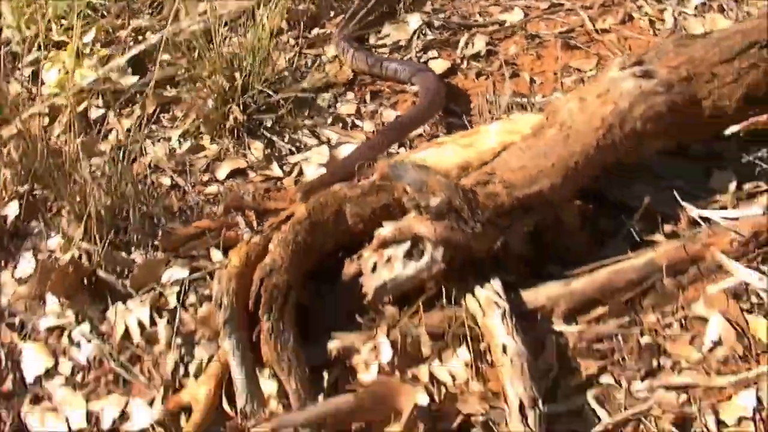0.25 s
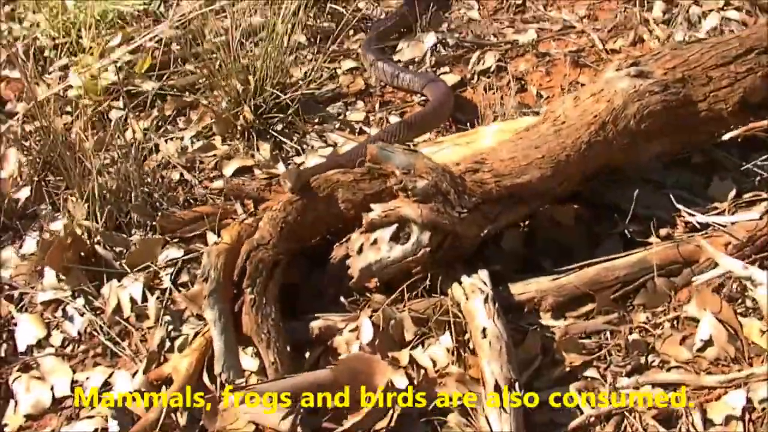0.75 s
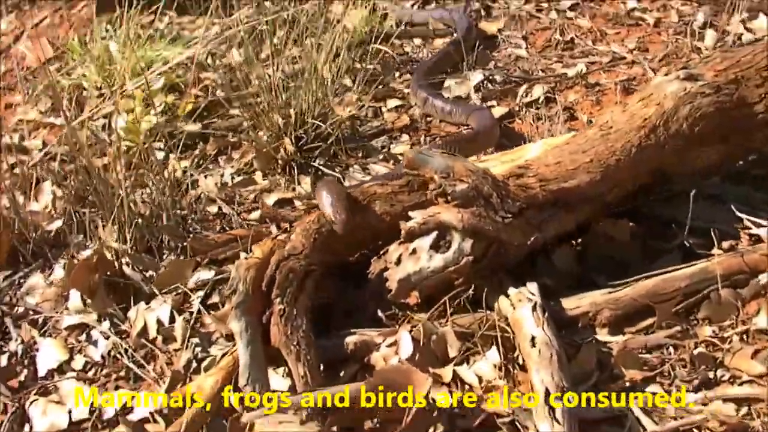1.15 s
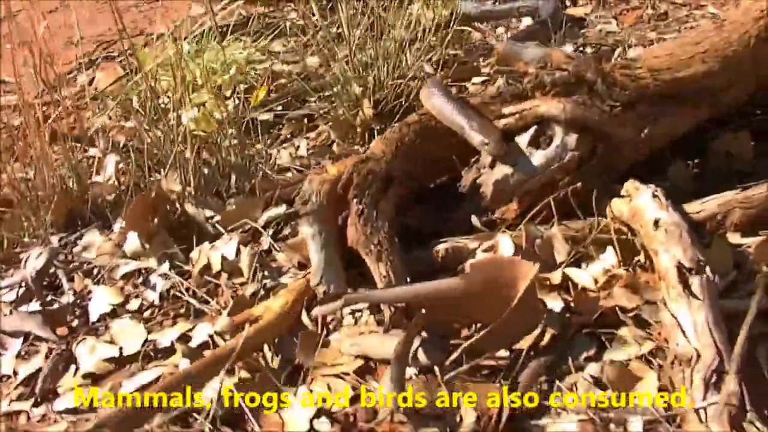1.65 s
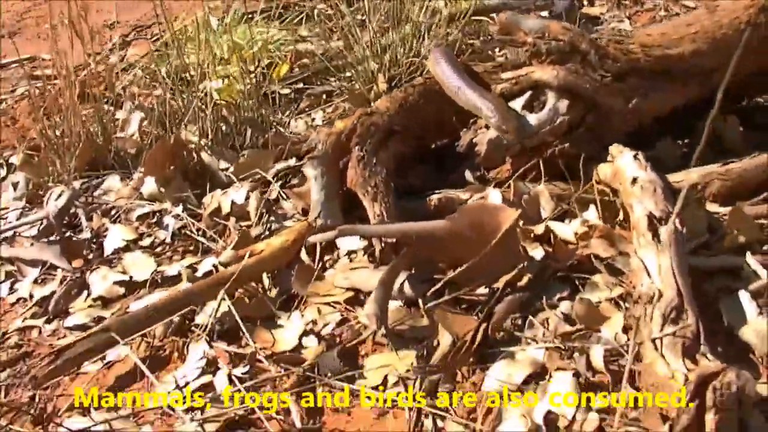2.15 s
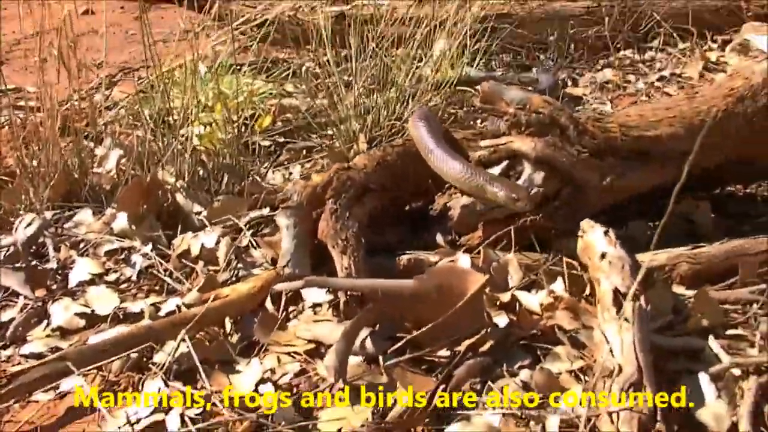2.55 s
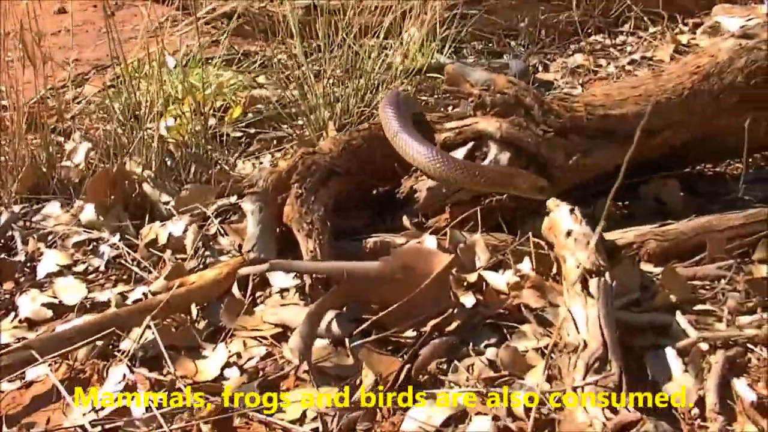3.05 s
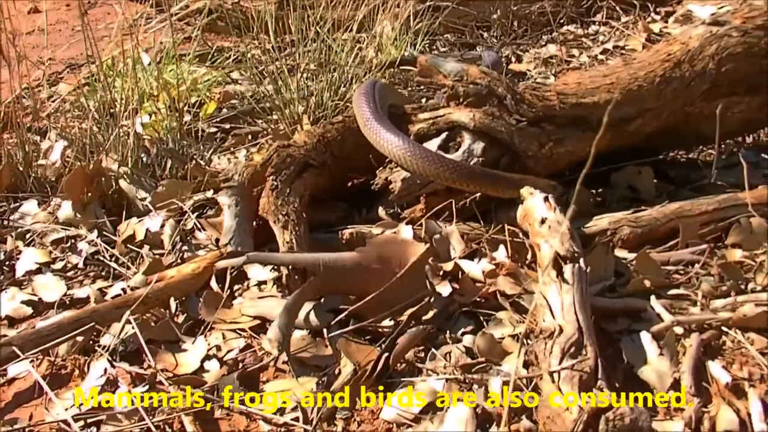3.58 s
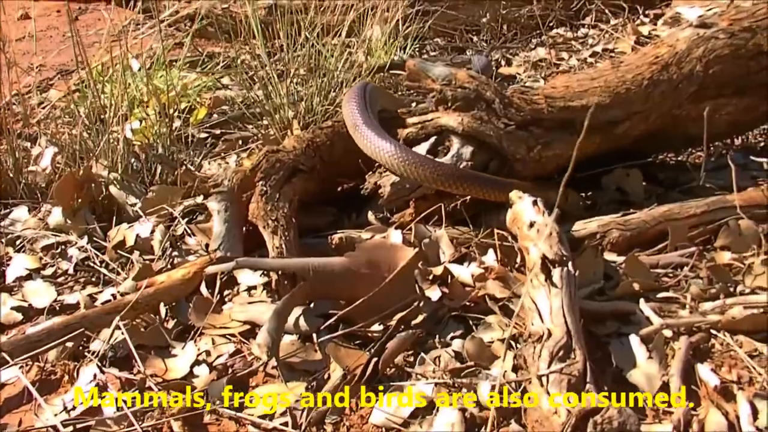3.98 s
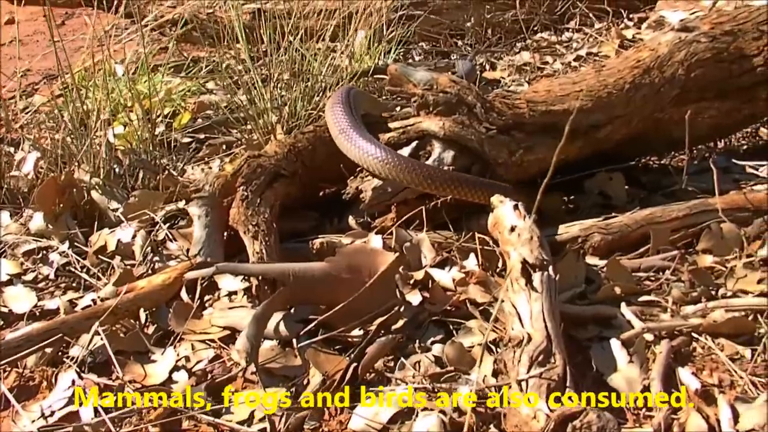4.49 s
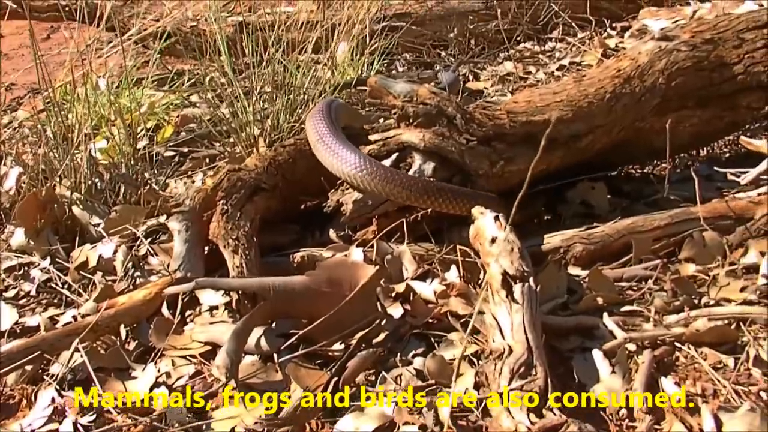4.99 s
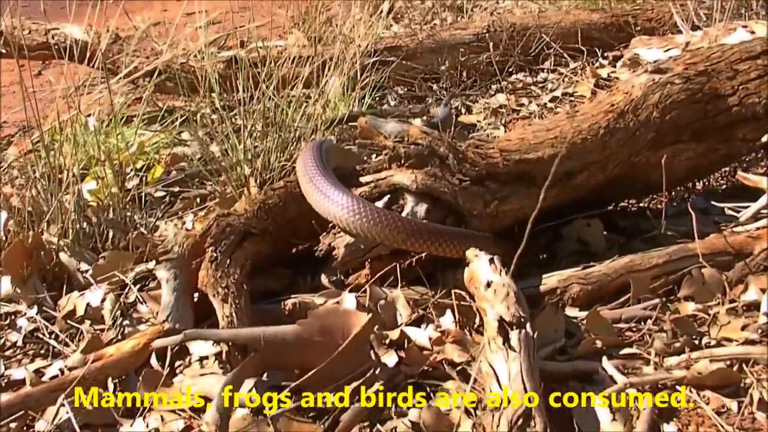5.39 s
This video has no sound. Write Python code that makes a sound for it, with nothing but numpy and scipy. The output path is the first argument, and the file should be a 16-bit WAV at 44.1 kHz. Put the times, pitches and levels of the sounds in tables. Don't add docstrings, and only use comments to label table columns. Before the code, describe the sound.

Very close, a snake pushes through dry leaf litter: dense crisp crackling with sharp snaps, loudest within the first second, then thinning to scattered ticks. Thin, very high squeaks follow as scales catch on bark, then a faint sliding hiss. Low wind puffs bump the small stereo microphone in two gusts over a quiet open-air hush, and a fly buzzes briefly at the very end.

```python
import sys
import numpy as np
from scipy import signal
from scipy.fft import rfft, irfft
from scipy.io import wavfile
from scipy.ndimage import uniform_filter1d

SR = 44100
rng = np.random.default_rng(int(sys.argv[2]) if len(sys.argv) > 2 else 0)


def invert_db(x):
    u = np.asarray(x, float) / 20
    return 10 ** u


def waveform_to_disk(signal):
    frames = np.transpose(np.atleast_2d(signal))
    scaled = np.clip(frames, -1, 1) * 32767
    samples = np.round(scaled).astype(np.int16)
    wavfile.write(sys.argv[1], SR, samples)


N = 248283
HZ = np.fft.rfftfreq(N, 1 / SR)
T = np.arange(N) / SR

# (low edge [Hz], high edge [Hz])
PIECE_BANDS = [(6000, 99000), (1500, 6000), (350, 1500)]


def evened(x):
    return x / np.sqrt(np.mean(x ** 2) + 1e-20)


def read(points, hz):
    f, value = np.transpose(points)
    return np.interp(np.log(hz + 1), np.log(f + 1), value)


def curve(rows, column, edge_db=-90):
    rows = np.array(rows)
    return np.interp(T, rows[:, 0], rows[:, column], edge_db, edge_db)


def band(x, lo_hz, hi_hz):
    sos = signal.butter(2, [lo_hz, min(hi_hz, SR / 2.2)], "band", fs=SR, output="sos")
    return signal.sosfilt(sos, x)


def share(hz, lo_hz, hi_hz):
    return np.sqrt(1 / (1 + (lo_hz / (hz + 1)) ** 8) / (1 + (hz / hi_hz) ** 8))


def pair(a, b, same):
    half = np.arccos(np.clip(read(same, HZ), -1, 1)) / 2
    mid = rfft(a) * np.cos(half)
    side = rfft(b) * np.sin(half)
    return irfft(np.array([mid + side, mid - side]), N)


def resonate(x, hz, width):
    turn = np.exp(2j * np.pi * np.cumsum(hz * np.ones(len(x))) / SR)
    r = np.exp(-np.pi * width / SR)
    return 2 * (turn * signal.lfilter([1 - r], [1, -r], x / turn)).real


def wander(per_s):
    width = int(SR / per_s)
    return evened(uniform_filter1d(uniform_filter1d(rng.standard_normal(N), width), width))


def patchy(x, patchy_db):
    z = signal.stft(x, nperseg=256)[2]
    field = rng.standard_normal(z.shape[1:])
    field = evened(uniform_filter1d(uniform_filter1d(field, 14, 0), 9, 1))
    return evened(signal.istft(z * invert_db(patchy_db * field), nperseg=256)[1][:, :N])


def add(mix, s, sound):
    part = mix[..., round(s * SR):][..., :sound.shape[-1]]
    part += sound[..., :part.shape[-1]]


def hush():
    # (frequency [Hz], level [dB per Hz])
    air_colour = [(59, -26.5), (100, -21.5), (240, -12.5), (600, -3), (1010, -2), (1600, -10),
                  (12800, -9.5), (15200, -11)]
    # (frequency [Hz], correlation [0-1])
    air_same = [(100, 0.94), (270, 0.81), (740, 0.9), (2000, 0.7), (3300, 0.94), (5500, 0.2), (9000, 0)]
    # (frequency [Hz], width [Hz], level [dB])
    drone_lines = [(221, 1.8, -70), (642, 35, -62.5), (873, 38, -60), (1037, 41, -63), (2240, 5.1, -70)]
    air = irfft(rfft(rng.standard_normal((2, N))) * invert_db(read(air_colour, HZ)), N)
    air = invert_db(-43.5) * evened(pair(*air, air_same))
    drone = sum(invert_db(db) * evened(resonate(rng.standard_normal(N), f, width)) for f, width, db in drone_lines)
    return air + drone


def wind():
    # (time [s], level [dB])
    breeze = [
        (0, -75),
        (2.9, -78),
        (3.3, -56),
        (3.85, -60.5),
        (4.12, -68.5),
        (4.43, -63.5),
        (5.0, -58),
        (5.63, -69.5),
    ]
    # (time [s], level [dB])
    puffs_left = [
        (3.381, -46),
        (3.396, -47),
        (4.877, -37),
        (4.893, -40),
        (4.924, -42.5),
        (4.974, -40),
        (4.999, -36),
        (5.012, -36),
        (5.057, -40),
    ]
    # (time [s], level [dB])
    puffs_right = [(3.123, -42.5), (3.352, -40), (3.362, -31.5), (3.46, -35), (3.496, -44.5),
                   (3.676, -46.5), (3.725, -42.5), (3.76, -42), (3.869, -43), (4.534, -43.5),
                   (4.561, -42.5), (4.726, -39.5), (4.858, -41), (4.888, -28), (4.92, -30.5), (4.956, -37),
                   (4.988, -32.5), (5.003, -33), (5.018, -38.5), (5.033, -43), (5.06, -39), (5.207, -41),
                   (5.375, -40.5), (5.399, -40)]
    # (time [s], peak level [dB])
    buffets = [(2.64, -54), (3.109, -50), (3.166, -48), (3.286, -44), (3.607, -41), (3.651, -47),
               (3.71, -49), (3.795, -51), (3.999, -52), (4.06, -49), (4.349, -52), (4.578, -45),
               (4.649, -45), (4.715, -42), (5.189, -43.5)]
    lumps = invert_db(4.7 * np.array([wander(33), wander(46)]))
    rumble = band(band(rng.standard_normal((2, N)), 87, 317), 42, 660) * lumps
    out = invert_db(curve(breeze, 1) + 3.5) * evened(rumble)

    t = np.arange(900) / SR
    swell = (t / 0.0038) ** 1.2 * np.exp(1.23 * (1 - t / 0.0053))
    for port, puffs in zip(out, (puffs_left, puffs_right)):
        for s, db in puffs:
            hz = 410 + 12.5 * (db + 36.0)
            push = band(band(rng.standard_normal(1800), 124, 1.54 * hz), 82, 2.07 * hz)[900:]
            eddies = invert_db(1.5 * evened(uniform_filter1d(rng.standard_normal(900), 40)))
            puff = swell * push / push[90:330].std() * eddies
            add(port, s - .005, invert_db(db) * band(puff, 122, 2800))

    buffet_hz, buffet_s = 152, 0.0061
    t = np.arange(-3 * buffet_s, 3 * buffet_s, 1 / SR)
    for s, db in buffets:
        phase, bend = rng.random((2, 2, 1))
        push = np.sin(2 * np.pi * (buffet_hz * (0.82 + .5 * bend) * t + phase))
        push *= np.exp(-(t / buffet_s) ** 2)
        add(out, s + 0.0122 + t[0], invert_db(db + np.array([[-1.5], [1.5]])) * push)
    return out


def fly():
    # (time [s], level [dB], wingbeat [Hz])
    flypast = [
        (5.57, -67, 280),
        (5.59, -45, 284),
        (5.61, -47, 273),
        (5.63, -57, 276),
    ]
    # (multiple of wingbeat [-], level [dB])
    wing_harmonics = [(1, 4.5), (2, 10), (3, 6), (4, -6), (5, 3)]
    rows = np.transpose(flypast)
    turns = np.cumsum(np.interp(T, rows[0], rows[2])) / SR
    buzz = sum(invert_db(db) * np.sin(2 * np.pi * k * turns) for k, db in wing_harmonics)
    return invert_db(curve(flypast, 1, edge_db=-120)) * evened(buzz)


def slide():
    # (time [s], level [dB])
    slide_level = [
        (3.2, -58),
        (3.32, -55),
        (3.6, -53),
        (3.75, -58),
        (3.95, -67),
        (4.8, -62),
        (4.93, -56),
        (5.2, -55),
        (5.45, -54),
        (5.63, -53.5),
    ]
    # (frequency [Hz], width [Hz], level [dB])
    scale_bands = [(10800, 300, 8), (12000, 400, 3), (13000, 300, 6), (13300, 350, 4), (12400, 3000, 8)]
    noise = rng.standard_normal((2, N)) * invert_db(2.0 * wander(120) + 0.9 * wander(14))
    hiss = np.zeros((2, N))
    for port, grains in zip(hiss, noise):
        for f, width, db in scale_bands:
            port += invert_db(db) * resonate(resonate(grains, f, 1.3 * width), f, 1.3 * width)
    return invert_db(curve(slide_level, 1) + 7.5) * evened(hiss)


def slip(hz, length, wobble):
    t = np.arange(max(int(length * SR), 60)) / SR
    shake = evened(uniform_filter1d(rng.standard_normal((2, len(t))), 60))
    tone = np.sin(2 * np.pi * np.cumsum(hz * (1 + wobble * shake[0])) / SR)
    swell = np.minimum(t / 0.0024, 1) * (0.66 + 0.35 * t / length)
    stop = np.minimum((length - t) / 0.00066, 1)
    return tone * invert_db(2.9 * shake[1]) * swell * stop


def squeak():
    # (time [s], level [dB], pitch [Hz])
    whistle = [
        (2.05, -62, 13300),
        (2.1, -49, 13300),
        (2.26, -57, 13100),
        (2.4, -44, 13000),
        (2.45, -60, 13800),
        (2.49, -47, 13000),
        (2.68, -52, 12600),
        (2.78, -50, 12800),
        (3.1, -60, 13300),
    ]
    # (time [s], peak level [dB], pitch [Hz])
    loud_slips = [(2.4059, -28, 12900), (2.422, -26, 14300), (2.473, -18.5, 13800), (2.489, -29, 13200),
                  (2.5097, -30, 13800), (2.5154, -27, 12900), (2.542, -30, 12760), (2.558, -34, 12300),
                  (2.582, -32, 14700), (2.607, -31, 12500), (2.624, -32, 12700), (2.65, -33, 12500),
                  (2.692, -36, 12700), (2.7262, -24.5, 14100), (2.746, -32, 12200), (2.757, -29, 13000),
                  (2.767, -30, 12900), (2.779, -33, 12800), (2.797, -32, 14700), (2.824, -32, 12700),
                  (2.8429, -19.5, 13600), (2.8674, -33, 14700), (2.903, -31, 12500), (3.06, -21.5, 13900)]
    # (time [s], peak level [dB], pitch [Hz], length [s])
    low_slips = [
        (2.082, -50, 7640, 0.028),
        (2.278, -48, 8250, 0.024),
        (2.402, -50, 7270, 0.027),
        (2.46, -49, 7340, 0.054),
        (2.937, -52, 8900, 0.044),
    ]
    rows = np.transpose(whistle)
    hz = np.interp(T, rows[0], rows[2]) * (1 + 0.035 * wander(260))
    fuzz = resonate(resonate(rng.standard_normal(N), hz, 1500), hz, 1500)
    fuzz = evened(invert_db(3.6 * wander(200)) * fuzz)
    skip = resonate(resonate(rng.standard_normal(N), 0.5 * hz, 500), 0.457 * hz, 500)
    skip = evened(invert_db(3.2 * wander(80)) * skip)
    strokes_per_s, stroke_start_s, gap_db = 41, 2.3, -5
    gap = ((1 + np.cos(2 * np.pi * strokes_per_s * (T - stroke_start_s + 0.0036))) / 2) ** 3
    out = invert_db(curve(whistle, 1) + gap_db * gap) * (fuzz + invert_db(-10.5) * skip)
    for s, db, f in loud_slips:
        add(out, s - .003, invert_db(db - 9.0) * slip(f, .0115, wobble=0.025))
    for s, db, f, length in low_slips:
        add(out, s, invert_db(db - 2.0) * slip(f, length, wobble=0.027))
    late = np.roll(out, 1)
    return invert_db(4.5) * np.array([out, 0.77 * out + 0.41 * late])


def chips():
    # (time [s], peak level [dB], pitch [Hz])
    litter_chips = [(0.005, -35, 1750), (0.0389, -30.5, 2190), (0.096, -30, 1110.0), (0.1043, -32, 1400.0),
                    (0.1068, -26.5, 5600.0), (0.1222, -26.5, 2220.0), (0.1247, -22, 14110.0),
                    (0.1302, -31, 1400.0), (0.1302, -27, 5600.0), (0.1338, -26, 3530.0),
                    (0.1347, -35, 1400.0), (0.1402, -31, 2800.0), (0.1417, -26, 8890.0),
                    (0.1422, -29, 880.0), (0.1876, -31.5, 2220.0), (0.221, -31, 890), (0.232, -24, 4440.0),
                    (0.236, -22, 7060.0), (0.2614, -25.5, 4440.0), (0.2648, -35, 2830),
                    (0.2664, -33, 5600.0), (0.3163, -36, 2800.0), (0.345, -24, 11200.0),
                    (0.3791, -33, 3530.0), (0.407, -28, 3560), (0.4071, -26, 11200.0), (0.438, -28, 7060.0),
                    (0.4654, -28, 11200.0), (0.4679, -28, 11200.0), (0.5143, -36, 1750), (0.5143, -25, 3570),
                    (0.5218, -23, 14110.0), (0.5248, -28, 11200.0), (0.5278, -42, 2220.0),
                    (0.537, -38, 2220.0), (0.5373, -25, 11200.0), (0.6011, -36, 5600.0),
                    (0.6316, -33, 14110.0), (0.6598, -33, 3530.0), (0.6625, -31, 14110.0),
                    (0.7525, -29, 2220.0), (0.7862, -10, 14110.0), (0.8102, -32, 2220.0),
                    (0.8381, -21, 7000), (0.882, -37, 880.0), (0.882, -32, 2220.0), (0.8945, -24, 11200.0),
                    (0.897, -24, 11200.0), (0.9204, -29, 4440.0), (0.9279, -26, 3530.0),
                    (0.9279, -22, 14110.0), (0.9349, -17, 14110.0), (0.9414, -19, 11200.0),
                    (0.9709, -28, 2220.0), (0.9803, -17, 11200.0), (0.9957, -39, 1110.0),
                    (1.0322, -29, 11200.0), (1.0501, -31, 11200.0), (1.0751, -40, 1400.0),
                  (1.0751, -34.5, 3530.0), (1.0771, -31, 11200.0), (1.0825, -33, 14110.0),
                  (1.1015, -31, 11200.0), (1.1205, -26, 11200.0), (1.1579, -33, 11200.0),
                  (1.2146, -11, 11300), (1.2232, -17, 11200.0), (1.2297, -25.5, 2220.0),
                  (1.2356, -24, 2220.0), (1.236, -17, 11200.0), (1.2522, -29, 4440.0),
                  (1.2522, -13, 14110.0), (1.2525, -33.5, 890), (1.3175, -26, 11200.0),
                  (1.324, -37, 2220.0), (1.3554, -29, 11200.0), (1.3844, -32, 14110.0),
                  (1.3943, -30, 11200.0), (1.4253, -26, 11200.0), (1.4881, -38, 2800.0),
                  (1.5156, -28, 11200.0), (1.532, -36, 1400.0), (1.5345, -35, 2220.0), (1.557, -33, 2800.0),
                  (1.557, -21, 11200.0), (1.6078, -33, 14110.0), (1.6248, -26, 14110.0),
                  (1.6423, -36, 7060.0), (1.657, -24, 11200.0), (1.6642, -38, 2220.0),
                  (1.6961, -31, 11200.0), (1.753, -31.5, 3530.0), (1.771, -25, 11200.0),
                  (1.7989, -36, 4440.0), (1.8054, -32, 8890.0), (1.8119, -35, 2800.0),
                  (1.8453, -33, 11200.0), (1.8488, -37, 3530.0), (1.8488, -25, 11200.0),
                  (1.9151, -31, 8890.0), (1.9211, -39, 3530.0), (1.9301, -26, 11200.0),
                  (1.9481, -29, 14110.0), (2.2345, -27.5, 2780), (2.2384, -35, 2800.0),
                  (2.2517, -34, 3530.0), (3.485, -34, 11200.0), (3.9101, -39, 14110.0),
                  (3.9867, -40, 8890.0), (4.8405, -32.5, 11200.0),
                    (.5757, -17, 4300),
        (.5775, -17, 5600),
        (.5182, -21, 6000),
        (3.36, -37, 800),
        (5.575, -36, 10800),
        (3.985, -43, 5200),
        (3.815, -44, 9500),
    ]
    out = np.zeros((2, N))
    t, hz = np.arange(1024) / SR - .004, np.fft.rfftfreq(1024, 1 / SR)
    for s, db, pitch_hz in litter_chips:
        t60 = 0.0041 + 8.3 / pitch_hz
        shape = invert_db(-60 * np.maximum(t, 0) / t60 + 60 * np.minimum(t, 0) / 0.0011)
        tick = rfft(rng.standard_normal((2, 1024)) * shape)
        tick /= uniform_filter1d(abs(tick), 24) ** .5
        octaves = np.log2((hz + 1) / pitch_hz)
        tick = irfft(tick * np.exp(-(octaves / .45) ** 2), 1024)
        tick /= tick[:, 170:250].std(1, keepdims=True)
        add(out, max(s - .0045, 0), invert_db(db - 3.5) * tick)
    return out


def snaps():
    # (time [s], peak level [dB], pitch [Hz])
    flakes = [(0.0644, -14, 10700), (0.1604, -18, 13600), (0.3274, -10, 12900), (0.4734, -19, 12300),
              (0.6803, 0.5, 13500), (0.6965, -6, 11500), (0.7165, -3, 10200), (0.8534, -11, 12000),
              (0.9064, -13, 9610), (0.9432, -12, 10300), (0.9835, -4, 12000), (0.9965, -6, 10200),
              (1.0032, -9, 13400), (1.0373, -8, 11100), (1.177, -11, 10800), (1.2054, -4, 13000),
              (1.218, -11, 11300), (1.289, -6.5, 12200), (1.3486, -16.5, 13200), (1.4182, -21, 9880),
              (1.5085, -2.5, 10400), (1.519, -15, 14000), (1.5451, -8, 11400), (1.732, -9, 9050),
              (1.8821, -20, 11800), (1.9204, -17, 12900)]
    # (time [s], level [dB], body over edge [dB], t60 [s],
    # pitch [Hz])
    leaf_breaks = [(0.0614, -26, -10, .008, 10700), (0.4062, -26.5, -10, 0.014, 4100),
                   (0.5036, -29, -11, .006, 10500), (0.5181, -24, -8, 0.0089, 5950),
                   (0.537, -35, -7, .012, 1840), (0.5647, -28, -10, 0.027, 10500),
                   (0.576, -22, -2, 0.021, 4660), (0.5816, -26, -5, 0.033, 4220),
                   (0.659, -22, -19, .007, 13600), (0.677, -15.5, -16, .049, 11100),
                   (0.7014, -15, -18, 0.022, 5250), (0.725, -22, -18, 0.04, 12400),
                   (0.849, -16, -24, 0.05, 12000), (0.882, -18.5, -13, 0.011, 14400),
                   (1.1201, -29.5, -0.5, 0.006, 3020), (1.2138, -23, -1.5, 0.012, 2240),
                   (1.222, -26.5, -2, 0.0054, 11300), (1.27, -22, -10, .004, 12000),
                   (1.5055, -21.5, -5, .003, 10500), (1.528, -24.5, -8, 0.015, 3900),
                   (1.6572, -31, -1, 0.0078, 2230), (1.7526, -27, -14, 0.0091, 10700),
                   (1.812, -26, -16, .006, 11200), (1.8662, -27, -11, 0.0078, 8100),
                   (1.425, -36.5, 0, 0.0065, 6950), (1.5804, -31.5, -10, .017, 9000),
                    (1.6424, -48.5, 14, .012, 3900), (1.915, -42.5, 6.5, .012, 2710),
                    (1.9293, -34, -2.5, 0.038, 3450), (1.953, -41.5, 8.5, 0.0088, 2500),
                    (1.999, -27.5, -16, .006, 5500), (2.228, -58, 24, 0.051, 2730),
                    (2.68, -33.5, -16, .02, 12700), (2.928, -35, -3.5, 0.004, 9050),
                    (2.9325, -37, -6, 0.0055, 8700), (3.2536, -24, -2, 0.012, 2970),
                    (3.325, -40, -7, .025, 8000), (3.553, -20.5, -16, 0.011, 13300),
                    (4.217, -40, -20, .009, 13000), (5.5733, -39, -11, .035, 10900)]
    # (time [s], level [dB], body over edge [dB], pitch [Hz])
    stem_cracks = [(0.1223, -31.5, -1.5, 1800), (.14, -53, 10, 1500), (0.195, -25, -11.5, 5280),
                   (0.221, -53, 16, 926), (0.7852, -14, -8.5, 2400), (0.9287, -37, 2, 800),
                   (0.9347, -22, -8.5, 3880), (.95, -43, 15.5, 990), (0.9701, -17, -15, 4600),
                   (0.9755, -10.5, -16.5, 5000), (1.2358, -23, -18, 5360), (1.252, -32, 0, 1010),
                   (2.769, -56.5, 18.5, 2800)]
    # (time [s], level [dB], pitch [Hz], half-length [s])
    stick_knock = (0.7865, -13.5, 810, .001)
    # (level [dB], half-length [s])
    ground_jolt = (-42, .002)
    leaf_low_db, stem_low_db = -14.5, 0
    breaks = [(s + 0.00093, db - 10, -18, 0.0083, f, leaf_low_db) for s, db, f in flakes]
    breaks += [(*row, leaf_low_db) for row in leaf_breaks]
    breaks += [(s, db, body_db, 0.0076, f, stem_low_db) for s, db, body_db, f in stem_cracks]

    out = np.zeros((2, N))
    t, hz = np.arange(1024) / SR - .005, np.fft.rfftfreq(1024, 1 / SR)
    sizes = np.array([share(hz, *edge) for edge in PIECE_BANDS])[:, None]
    after, before = np.maximum(t, 0), np.minimum(t, 0)
    for s, fine_db, body_db, t60, pitch_hz, low_db in breaks:
        t60 = max(0.5 * t60, .002)
        rattle = invert_db(-24.5 - 60 * after / 0.063)
        shape = (invert_db(-60 * after / t60) + rattle) * invert_db(before * 60 / 0.0025)
        tear = rfft(rng.standard_normal((2, 1024)) * shape)
        tear /= uniform_filter1d(abs(tear), 24) ** 0.51
        octaves = np.log2((hz + 1) / pitch_hz)
        ring = invert_db(5.5 * np.exp(-(octaves / 0.24) ** 2) + 3.5 * np.minimum(octaves, 0))
        parts = irfft(tear * ring * sizes, 1024)
        parts /= parts[..., 170:270].std(2, keepdims=True)
        part_db = fine_db + np.array([0, body_db, body_db + low_db])
        add(out, s - .005, (invert_db(part_db)[:, None, None] * parts).sum(0))

    s, db, ring_hz, half_s = stick_knock
    add(out, s - .005, invert_db(db) * np.exp(-(t / half_s) ** 2) * np.cos(2 * np.pi * ring_hz * t))
    jolt_db, jolt_s = ground_jolt
    jolt = np.exp(-((T - s) / jolt_s) ** 2) * np.cos(2 * np.pi * 150 * (T - s))
    return out + invert_db(jolt_db) * jolt


def crush():
    # (time [s], force [dB], crispness [dB], growth [dB])
    pushes = [(0.0, -34, 3, -2), (.02, -35.5, -1, 3.5), (.07, -36, 2, -1), (0.116, -31, -2.5, -2),
              (0.16, -34.5, 6.5, 9.5), (0.24, -34, 6, 1), (.257, -32, 8, -3), (0.286, -36, 5, -3),
              (.31, -34, 5, 1), (.335, -35.5, 8, -3.5), (.4, -37, 10, -1), (.425, -39.5, 3, 5),
              (.455, -36, 11, 0), (0.476, -39.5, -1, 2), (0.503, -35, -1, -4), (0.548, -41.5, -2, 1),
              (0.579, -41, -5, 1), (0.606, -47.5, 6, -3), (0.659, -41, 6, 26), (0.677, -34, 14, 7),
              (0.719, -23, 7.5, 1), (.752, -26, 6.5, -1), (0.791, -27.5, 7, 6.5), (0.861, -31.5, 2, 1),
              (.915, -29.5, -0.5, 0.5), (1.003, -39.5, 8, -5), (1.101, -46, 5, 1), (1.158, -40.5, 8, 5),
              (1.2, -33.5, 8, 8.5), (1.251, -40.5, 9, -9), (1.425, -44, 13.5, 1), (1.505, -39.5, 9, 11),
              (1.567, -44.5, 10, 4), (1.637, -46.5, 5, -13), (1.752, -41, 9, -8), (1.775, -47, 9, -1),
              (1.823, -46.5, 5, -14), (2.083, -50.5, 6, -5), (2.179, -47, -5, 0), (2.229, -49, -8, -4),
              (2.27, -48.5, 4, -4), (2.36, -68, 2, -5)]
    # (frequency [Hz], level [dB per Hz])
    litter_colour = [(250, -10), (600, -6.5), (1200, -9), (3000, 3), (6000, 5), (11500, 25), (15000, 26.5),
                     (16500, 34.5)]
    rows = np.array(pushes)
    now = np.clip(np.searchsorted(rows[:, 0], T, "right") - 1, 0, len(rows) - 1)
    span = np.append(np.diff(rows[:, 0]), 1)
    growth_db = rows[now, 3] * np.clip((T - rows[now, 0]) / span[now] - .5, -.5, .5)

    busy = invert_db(2.5 * wander(400))
    happens = rng.random(N) < 2500 * busy / SR
    size = invert_db(4.3 * np.minimum(rng.exponential(1, N), 3.2)) * happens
    leaf = rng.integers(0, 16, N)
    t = np.arange(300) / SR
    cracks = np.zeros((2, N))
    for k in range(16):
        tilt = rng.uniform(-1.2, 0.26)
        crack = signal.lfilter([1, tilt], [1], rng.standard_normal((2, 300))) * invert_db(-60 * t / 0.0027)
        cracks += signal.oaconvolve((size * (leaf == k))[None], crack, axes=1)[:, :N]

    friction = np.sqrt(busy) * rng.standard_normal((2, N))
    bed = patchy(evened(cracks) + invert_db(-2.5) * evened(friction), patchy_db=2.0)
    bed /= uniform_filter1d((bed ** 2).mean(0), 900) ** 0.14
    bed = rfft(bed) * invert_db(read(litter_colour, HZ))

    force_db, crisp_db = rows[now, 1], rows[now, 2]
    soil_db = -51.5 + 0.69 * (force_db + 42.5) - 0.51 * crisp_db
    out = np.zeros((2, N))
    for db, edge in zip((force_db + crisp_db, force_db, soil_db), PIECE_BANDS):
        level = uniform_filter1d(invert_db(db + growth_db), 90)
        out += level * evened(irfft(bed * share(HZ, *edge), N))
    return out


def scene():
    # (frequency [Hz], correlation [0-1])
    litter_same = [(300, 1), (1200, 1), (3000, 1), (4900, 0.88), (9000, 0.61), (15000, 0.4)]
    # (frequency [Hz], phase [rad])
    left_lead = [(5000, 0), (7500, .3), (11300, .7), (15400, .8)]
    rest = hush() + wind() + fly() + slide() + squeak()
    litter = chips() + snaps() + crush()
    leaves = rfft(pair(*litter, litter_same)) * invert_db(np.array([[.5], [-.5]]))
    lead = np.exp(.5j * np.array([[1], [-1]]) * read(left_lead, HZ))
    return irfft(leaves * lead, N) + rest


def roll_off(x):
    return signal.sosfilt(signal.butter(12, 16610, fs=SR, output="sos"), x)


def record(dry):
    notch = 1 - 1.0 / (1 + ((HZ - 7950) / 70) ** 2)
    below = 1 / (1 + (HZ / 15290) ** 300)
    top = irfft(rfft(dry) * (1 - below) / (1 + (HZ / 16150) ** 200), N)
    power = uniform_filter1d((top ** 2).mean(0), 100)
    sudden = power > 5.0 * uniform_filter1d(power, 3000)
    kept = np.minimum(uniform_filter1d(sudden * 1., 300) * 8, 1)
    whole = irfft(rfft(dry) * notch * below, N) + invert_db(-15) * kept * top
    return roll_off(np.clip(whole, -1, 1))


dry = scene()
out = record(dry)
waveform_to_disk(out)
```